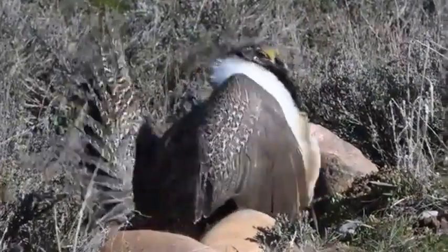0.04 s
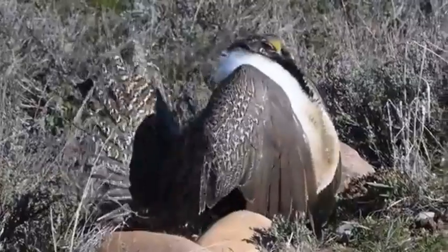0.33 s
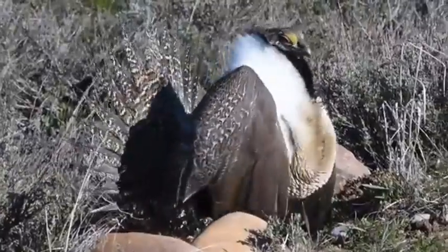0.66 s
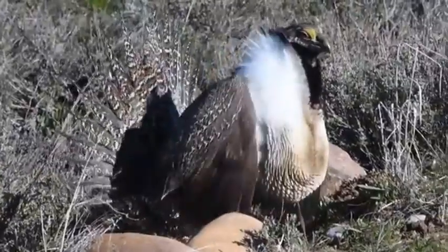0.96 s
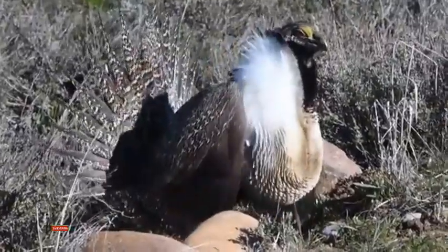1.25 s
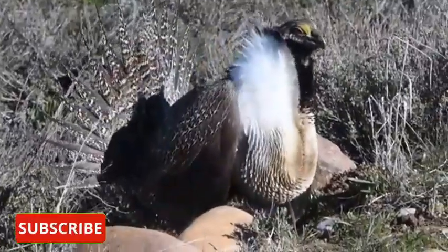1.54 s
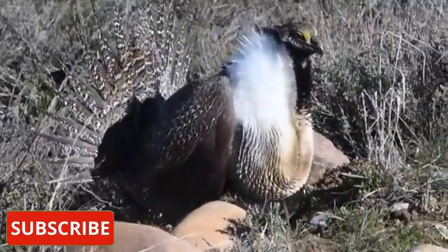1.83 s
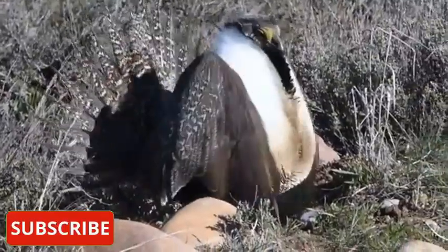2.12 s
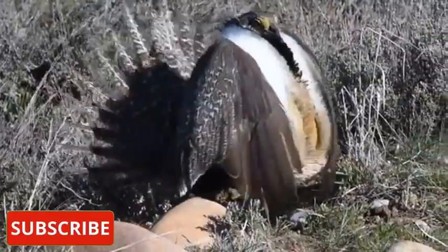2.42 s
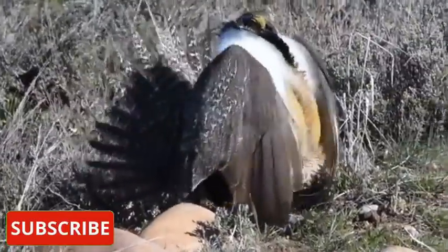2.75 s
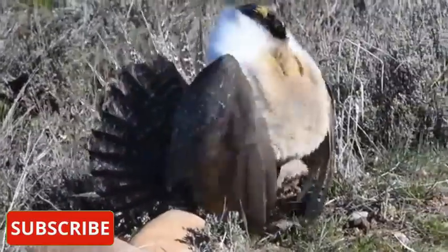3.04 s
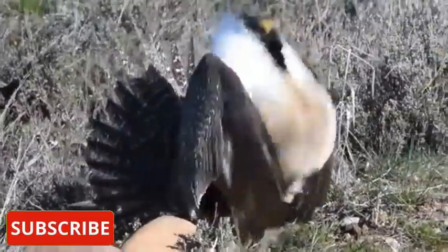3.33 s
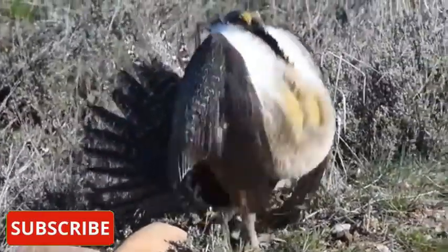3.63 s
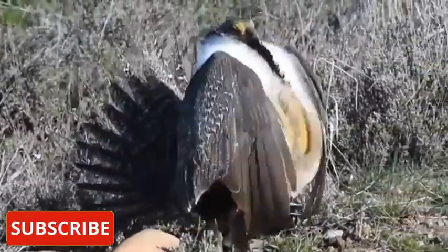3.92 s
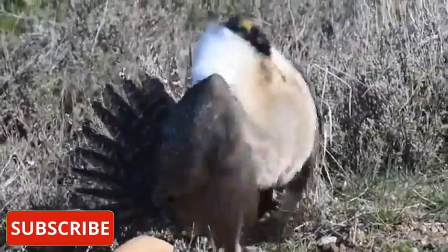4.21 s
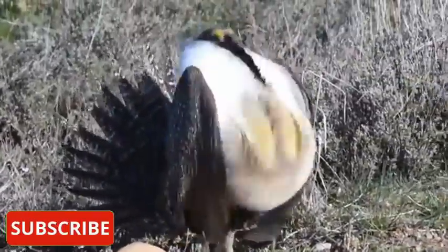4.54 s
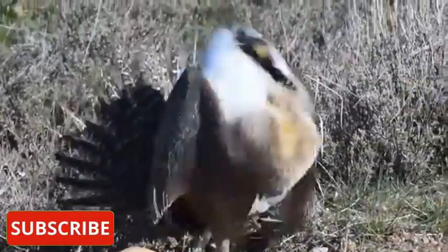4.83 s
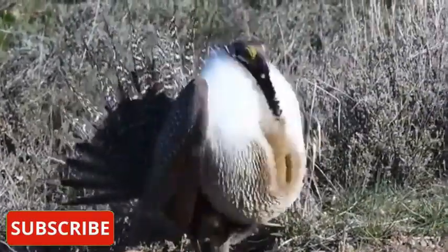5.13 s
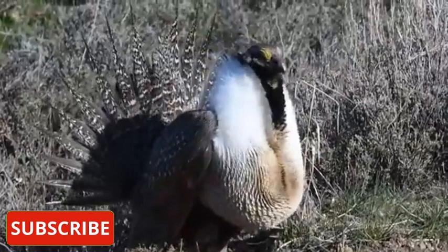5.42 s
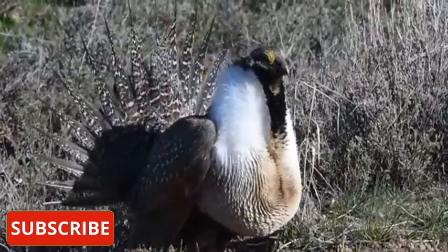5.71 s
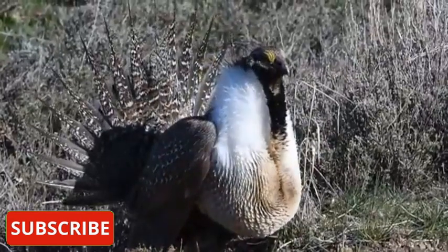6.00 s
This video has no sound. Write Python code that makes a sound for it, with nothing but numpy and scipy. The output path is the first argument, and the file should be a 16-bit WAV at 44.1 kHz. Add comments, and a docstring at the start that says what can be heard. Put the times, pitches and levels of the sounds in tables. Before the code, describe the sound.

On a quiet open plain, a male grouse close to the microphone swishes its wings over stiff breast feathers while a sparrow farther off buzzes, trills and warbles. Soft low thuds from its air sacs follow, with feather rasps and dull puffs. Three hollow coos lead into a sharp pop, a looping whistle and a louder second pop. Faint air and distant chirps continue underneath.

```python
"""A male sage-grouse displays close by on a quiet, open plain, over faint air and the murmur of far grouse.
First his wings swish over stiff breast feathers. Far birds call, and a sparrow buzzes, trills and warbles.
Then his air sacs fill with soft thuds, while his wings rasp over ridged feathers and his breast puffs air.
Last come three coos, a pop of taut sac skin, a looping whistle and a second pop; far birds call on."""
import sys
import numpy as np
from scipy import signal
from scipy.fft import rfft, irfft
from scipy.io import wavfile
from scipy.ndimage import uniform_filter1d

SR = 44100
rng = np.random.default_rng(int(sys.argv[2]) if len(sys.argv) > 2 else 0)


def to_wav(sig):
    """Store sig (one row per channel, or 1-D mono) as 16-bit WAV at the path in sys.argv[1].

    Samples outside -1..1 are clipped; the rate is SR.
    """
    pcm = np.clip(np.atleast_2d(sig), -1, 1) * 32767
    pcm = np.round(pcm).astype(np.int16)
    wavfile.write(sys.argv[1], SR, pcm.T)  # frames by channels


N = 267466
TIME = np.arange(N) / SR
BINS_HZ = np.fft.rfftfreq(N, 1 / SR)


def gain_of(db):
    """Turns decibels into a number to multiply by."""
    return 10 ** (np.asarray(db) / 20)


def evened(x):
    """Scales x to an average (rms) size of 1."""
    return x / np.sqrt(np.mean(abs(x) ** 2) + 1e-20)


def read(points, hz):
    """Looks up a table at the frequencies hz, with octaves evenly spaced."""
    known_hz, value = np.transpose(points)
    return np.interp(np.log(hz + 1), np.log(known_hz + 1), value)


def follow(rows, t):
    """Reads every column of a curve at the times t."""
    times, *columns = np.transpose(rows)
    return [np.interp(t, np.sort(times), column) for column in columns]


def add(mix, start_s, sound):
    """Adds a sound to the mix at start_s."""
    part = mix[max(round(start_s * SR), 0):][:len(sound)]
    part += sound[:len(part)]


def coloured(x, spectrum):
    """Gives x a balance of bass and treble, at an average size of 1."""
    return evened(irfft(rfft(x) * gain_of(read(spectrum, BINS_HZ)), N))


def drift(size, per_s):
    """A random wander that takes per_s turns a second."""
    knots = rng.standard_normal(4000)
    return evened(np.interp(np.arange(size) / SR * per_s, np.arange(len(knots)), knots))


def swell(peak_s, rise_s, fall_s, shape):
    """A rounded hump of loudness, 10 dB down at rise_s before its peak and fall_s after."""
    away = np.maximum((peak_s - TIME) / rise_s, (TIME - peak_s) / fall_s)
    return gain_of(-10 * np.minimum(abs(away) ** shape, 20))


def tone(hz, db):
    """A pure tone (a complex sine) that follows a pitch and a level, with softened ends."""
    edge = np.minimum(np.arange(len(hz)), np.arange(len(hz))[::-1]) / 40
    return np.sqrt(2) * gain_of(db) * np.minimum(edge, 1) * np.exp(2j * np.pi * np.cumsum(hz) / SR)


def fuzzy(hz, width_hz):
    """A band of noise that follows the pitch hz."""
    pole = np.exp(-np.pi * abs(width_hz) / SR)
    noise = rng.standard_normal((len(hz), 2)) @ [1, 1j]
    return evened(signal.lfilter([1], [1, -2 * pole, pole * pole], noise)) * tone(hz, 0)


def place(sound, pan_db, lead_rad=0):
    """Makes stereo: the left side is pan_db louder and, for a complex sound, lead_rad ahead."""
    side = np.array([[.5], [-.5]])
    pair = sound * gain_of(side * pan_db) * np.exp(1j * side * lead_rad)
    return pair.real / np.cosh(pan_db * np.log(10) / 40)


def arcs(table, fade_db, shape):
    """One curve a note: the pitch bends through three values, the level falls away from its peak."""
    progress, curves = np.linspace(0, 1, 41), []
    for start_s, length_s, db, first_hz, middle_hz, last_hz, peak in table:
        bow = 2 * progress * (1 - progress) * (2 * middle_hz - first_hz - last_hz)
        hz = first_hz + (last_hz - first_hz) * progress + bow
        away = np.interp(progress, [0, np.clip(peak, 0, 1), 1], [1, 0, 1])
        curves.append(np.c_[start_s + progress * length_s, hz, db - fade_db * away ** shape])
    return curves


def notes(curves, waver, flutter_db, octave_db, smooth_samples=60):
    """Plays curves as almost pure notes that waver a little, with a weak tone one octave up."""
    out = np.zeros(N, complex)
    for rows in curves:
        t = np.arange(rows[0][0], max(rows[-1][0], rows[0][0] + .004), 1 / SR)
        hz, db = uniform_filter1d(np.array(follow(rows, t)), size=smooth_samples, axis=1)
        hz = hz * (1 + waver * drift(len(t), 403))
        db = db + flutter_db * drift(len(t), 218)
        add(out, t[0], tone(hz, db) + tone(2 * hz, db + octave_db))
    return out


def repeated(curves, repeats):
    """Copies the curves to the time, level and pitch of each repeat."""
    return [[(start_s + t, hz * pitch, db + change_db) for t, hz, db in rows]
            for start_s, change_db, pitch in repeats for rows in curves]


# The colour of still air: frequency_hz, relative_db
AIR_COLOUR = [(20, -19), (60, -2.5), (130, 2), (280, 0.5), (500, -2.5), (1000, -5), (2100, -9),
              (3500, -9.5), (5500, -11.5), (7000, -18), (9000, -20.5), (11000, -17.5), (15500, -21.5)]
# How alike left and right are: frequency_hz, likeness (0 to 1)
AIR_LIKENESS = [(60, 0.27), (150, 0.084), (380, 0.17), (950, 0.078), (2380, 0.033), (5980, 0.039),
                (15000, 0.03)]
def air(level_db=-52):
    """A faint outdoor wash and an even hiss, almost unrelated on the two sides."""
    left, other = rfft(rng.standard_normal((2, N)))
    likeness = read(AIR_LIKENESS, BINS_HZ)
    right = likeness * left + np.sqrt(1 - likeness ** 2) * other
    return coloured(irfft(np.array([left, right]), N), AIR_COLOUR) * gain_of(level_db)


# Swells in the far grouse's murmur: peak_s, level_db, pitch_hz, rise_and_fall_s
MURMUR_SWELLS = [(.93, -56.5, 190, 0.054), (1.7, -61.5, 239.7, 0.5), (2.455, -49, 213, .05),
                 (2.6, -53, 186.2, 0.11), (5.2, -59.5, 295.4, 0.2), (5.49, -54, 187.2, 0.058)]
def far_grouse(width_hz=120, steady_db=-69, steady_hz=210):
    """Other grouse, blurred by distance to a low murmur that swells now and then."""
    out = fuzzy(np.full(N, steady_hz), width_hz) * gain_of(steady_db)
    for peak_s, db, hz, slope_s in MURMUR_SWELLS:
        out += fuzzy(np.full(N, hz), width_hz) * gain_of(db) * swell(peak_s, slope_s, slope_s, shape=1.9)
    return place(out, pan_db=-1)


# A wing brushes the breast: peak_s, level_db, rise_s, fall_s, extra_treble_db
WING_STROKES = [(.01, -55, .05, 0.14, -7), (.85, -54, 0.42, 0.15, -4.5), (2.21, -52, 0.16, 0.17, -4),
                (2.46, -61, 0.15, 0.58, -1), (2.97, -47.5, 0.2, 0.21, 8), (3.16, -45, 0.079, .045, 5),
                (3.33, -58, 0.087, 0.13, 10.5), (3.46, -42.5, 0.066, .05, -5),
                (3.645, -41.5, 0.077, 0.12, -3), (3.925, -45, 0.076, .14, -2.5),
                (4.2, -43.5, 0.085, 0.098, 10), (4.31, -47, 0.085, 0.032, 5.5),
                (4.57, -57, 0.19, 0.12, 7.5), (4.705, -48.5, 0.054, 0.067, 5), (5.0, -64, 0.75, .17, 9.5)]
# The colour of rubbed feathers: frequency_hz, relative_db
FEATHER_COLOUR = [(150, -20), (450, -17), (800, -7), (1400, -9.5), (1850, -0.5), (2300, 3), (3000, -7.5),
                  (4300, -4.5), (6200, -9.5), (7500, -16), (9000, -15.5), (12000, -25.5), (15500, -46)]
# Which side the swish leans to: frequency_hz, left_minus_right_db
FEATHER_PAN = [(60, -3), (150, -5), (380, -10), (950, -1), (2380, -8.5), (5980, 2), (15000, 0)]
def wings(resting_db=-67.5, grain_db=1, likeness=0.69, treble_hz=5000):
    """Countless tiny feather barbs slip past the wing; each stroke swells out of a faint rustle."""
    low_power = treble_power = gain_of(resting_db) ** 2
    for peak_s, db, rise_s, fall_s, treble_db in WING_STROKES:
        power = (gain_of(db) * swell(peak_s, rise_s, fall_s, shape=1.8)) ** 2
        low_power = low_power + power
        treble_power = treble_power + power * gain_of(treble_db) ** 2
    slips = coloured(rng.standard_normal((2, N)) * gain_of(grain_db * drift(N, 600)), FEATHER_COLOUR)
    treble = irfft(rfft(slips) * BINS_HZ ** 2 / (BINS_HZ ** 2 + treble_hz ** 2), N)
    centre, spread = (slips - treble) * np.sqrt(low_power) + treble * np.sqrt(treble_power)
    side = np.array([[1], [-1]])
    swish = centre + np.sqrt((1 - likeness) / 2) * side * spread
    return irfft(rfft(swish) * gain_of(side * read(FEATHER_PAN, BINS_HZ) / 2), N)


# Single far calls: start_s, length_s, level_db, first_hz, middle_hz, last_hz, peak_fraction
FAR_NOTES = [(.485, .11, -64, 2950, 2720, 2760, 0.2), (.8, 0.066, -56, 3350, 3230, 3190, 0.7),
             (.86, .15, -55.5, 3070, 2860, 2850, .5), (2.35, 0.26, -60, 2260, 2082, 1993, 0.1),
             (2.796, 0.028, -51.5, 3290, 3030, 2850, .7), (5.116, 0.03, -57, 2600, 2160, 1870, .3),
             (5.206, .019, -47.5, 2130, 2620, 3120, .5), (5.219, 0.016, -39.5, 2150, 2440, 1980, 0.7),
             (5.235, .032, -55.5, 2030, 1930, 1920, 0.55), (5.643, .034, -59, 2840, 2610, 2370, .4),
             (5.962, .028, -53.5, 4250, 4440, 4740, .35), (6.031, 0.025, -52, 4310, 4470, 4700, .3)]
# One chirp: delay_s, length_s, level_db, first_hz, middle_hz, last_hz, peak_fraction
CHIRP_NOTE = [(0.00032, 0.0338, -47, 3380, 4220, 3100, 0.1)]
# A run of those chirps: start_s, change_db, pitch_factor
CHIRP_REPEATS = [(3.108, -2, 1), (3.194, 2.5, 0.99), (3.282, -0.5, 0.98), (3.366, -1.5, 1)]
def far_birds():
    """Birds farther off give short calls and a run of chirps that rise and fall."""
    calls = arcs(FAR_NOTES, fade_db=5.5, shape=0.9)
    chirps = repeated(arcs(CHIRP_NOTE, fade_db=10, shape=1.3), CHIRP_REPEATS)
    out = notes(calls + chirps, waver=0.0096, flutter_db=3.1, octave_db=-19.5)
    return place(out, pan_db=-3.5, lead_rad=-0.54)


# Buzzes: start_s, length_s, level_db, first_hz, last_hz, swing_hz,
# first_flicks_per_s, last_flicks_per_s, fade_db
SPARROW_BUZZES = [(1.088, 0.16, -35, 4470, 4890, 446, 193, 167, 7.5),
                  (1.407, 0.15, -34.5, 4600, 4870, 450, 143.4, 214, 8.5),
                  (2.163, 0.074, -41, 5910, 5810, 696, 308, 273, 1.5),
                  (2.434, 0.059, -42.5, 6130, 5720, 660, 283, 269, 7),
                  (2.71, 0.035, -44.5, 5350, 4000, 400, 300, 290, 0)]
# The voice box's other side holds a note under the first two buzzes: time_s, pitch_hz, level_db
HELD_NOTES = [
    [(1.1, 4300, -45), (1.122, 4130, -39), (1.16, 4070, -42), (1.2, 4100, -49), (1.222, 3800, -56)],
    [(1.42, 4350, -41), (1.44, 4220, -38.5), (1.47, 4095, -41.5), (1.52, 4220, -47), (1.54, 4080, -52)],
]
def sparrow_buzzes(jitter=0.076, throb_db=3, rough_db=2, waver_hz=60):
    """The pitch flicks up unevenly, a few hundred times a second; each buzz starts soft, then catches."""
    out = np.zeros(N, complex)
    for start_s, length_s, db, first_hz, last_hz, swing_hz, first_rate, last_rate, fade_db in SPARROW_BUZZES:
        size = int(length_s * SR)
        progress = np.linspace(0, 1, size)
        rate = np.linspace(first_rate, last_rate, size) * (1 + jitter * drift(size, 117))
        phase = 2 * np.pi * np.cumsum(rate) / SR
        flick = (.5 + .5 * signal.sawtooth(phase, .8)) ** 3
        flick_hz = 2 * swing_hz * np.minimum(0.43 + 2 * progress, 1)  # widens as the note takes hold
        glide_hz = first_hz + (last_hz - first_hz) * progress ** 1.4
        hz = glide_hz + flick_hz * (flick - flick.mean()) + waver_hz * drift(size, 908)
        catch_db = np.interp(progress, [0, 0.12, 0.142], [-16, -13, 0])
        shake_db = throb_db * np.sin(phase - .6) + rough_db * drift(size, 420)
        release = np.minimum((1 - progress) / 0.17, 1) ** 1.2
        buzz = tone(hz, db + catch_db - fade_db * progress + shake_db) * release
        band_hz = [min(first_hz, last_hz) - 0.74 * swing_hz, max(first_hz, last_hz) + 0.74 * swing_hz]
        throat = signal.butter(3, band_hz, "band", fs=SR, output="sos")
        add(out, start_s, signal.sosfilt(throat, buzz))
    out += notes(HELD_NOTES, waver=0.01, flutter_db=-0.5, octave_db=-29)
    return place(out, pan_db=-2.5, lead_rad=-0.55)


# Sliding notes: start_s, length_s, level_db, first_hz, middle_hz, last_hz, peak_fraction
SLIDES = [(1.257, 0.091, -44.5, 2880, 3060, 2600, 0.28), (1.34, .02, -41.5, 2650, 2444, 2120, 0.5),
          (1.356, 0.024, -52.5, 2100, 1900, 1830, 0), (1.56, 0.087, -42.5, 2880, 3090, 3030, 0.5),
          (2.695, 0.029, -44.5, 5860, 5400, 4600, 0.4), (2.724, 0.048, -43, 4840, 3510, 2750, 0.26),
          (2.897, .044, -44, 5600, 5230, 4100, 0.5), (2.938, .04, -45, 4150, 3250, 2680, 0.1)]
def sparrow_slides():
    """The sparrow's plain whistles, most of them sliding down."""
    out = notes(arcs(SLIDES, fade_db=9, shape=1.05), waver=0.011, flutter_db=1.5, octave_db=-20.5)
    return place(out, pan_db=-5, lead_rad=-0.26)


# Five quick notes: delay_s, length_s, level_db, first_hz, middle_hz, last_hz, peak_fraction
TRILL_NOTES = [(0, 0.0067, -37, 3350, 3880, 3370, 1), (.006, 0.017, -34, 3680, 3800, 3060, 0.44),
               (.021, 0.0077, -35.5, 4670, 3850, 3170, .4), (.029, .017, -37, 4400, 3880, 3650, .25),
               (.059, .026, -36, 7250, 6220, 4930, 0.72)]
# Each time they are sung: start_s, change_db, pitch_factor
TRILL_REPEATS = [(1.699, -1, 1.004), (1.817, -1, 0.98), (1.931, -2.5, 1.002), (2.046, -1.5, 1.02)]
def sparrow_trill():
    """A flick, three quick slides and a high falling note, sung four times over."""
    curves = repeated(arcs(TRILL_NOTES, fade_db=17, shape=1.7), TRILL_REPEATS)
    return place(notes(curves, waver=0.025, flutter_db=0.6, octave_db=-35), pan_db=1.3)


# Wobbling notes: start_s, length_s, level_db, first_hz, top_hz, dip_hz, dips_per_s
SPARROW_WARBLES = [(2.244, .148, -44.5, 3520, 4005, 663, 69), (2.501, 0.14, -44, 3510, 3985, 650, 59)]
def sparrow_warbles(throb_db=12, climb_s=.045, jitter=0.14, waver_hz=70, rough_db=2):
    """The pitch dips again and again, and the note is loudest in each dip; no two are quite alike."""
    out = np.zeros(N, complex)
    for start_s, length_s, db, first_hz, top_hz, dip_hz, rate in SPARROW_WARBLES:
        size = int(length_s * SR)
        turns = np.cumsum(rate * (1 + jitter * drift(size, 122))) / SR
        grown = np.minimum(TIME[:size] / climb_s, 1)  # the note starts smooth and low
        flick = grown * (1 - abs(np.sin(np.pi * turns)))
        hz = first_hz + (top_hz - first_hz) * grown - dip_hz * (1 - flick) + waver_hz * drift(size, 703)
        level_db = db - throb_db * flick + rough_db * drift(size, 397)
        add(out, start_s, tone(hz, level_db) * signal.windows.tukey(size, .25))
    return place(out, pan_db=1.3)


# One tick: delay_s, length_s, level_db, first_hz, middle_hz, last_hz, peak_fraction
TICK_NOTE = [(0.0016, 0.0063, -47.5, 9300, 5300, 5100, 0.66)]
# A run of ticks: start_s, change_db, pitch_factor
TICK_REPEATS = [(2.428, 2, 1), (2.49, -3, 0.94), (2.541, 2.5, 0.8), (2.593, 1.5, 0.99), (2.641, 1, 0.98)]
def ticking_bird():
    """Another small bird's notes drop so fast that they sound like thin ticks."""
    curves = repeated(arcs(TICK_NOTE, fade_db=13, shape=1.2), TICK_REPEATS)
    return place(notes(curves, waver=0.025, flutter_db=0.6, octave_db=-35), pan_db=1.3)


# Three thuds, then the two pops: start_s, level_db, first_hz, settled_hz, glide_s, rise_s, ring_s
SAC_BLOWS = [(2.944, -46, 149, 130, 0.013, 0.007, 0.084), (3.184, -38, 104, 123, 0.022, 0.0091, 0.2),
             (4.335, -32.5, 105, 124.3, 0.018, .014, 0.18),
             (4.8051, -13.5, 270, 128.5, 0.0045, 0.00068, 0.028),
             (4.9992, -1, 279, 350, 0.01, 0.0064, 0.046)]
def sac_booms(choke=1.07, lowest_hz=85):
    """Each blow sets the air sacs swinging; the pitch settles, and they fade faster as the skin slackens."""
    out, t = np.zeros(N, complex), TIME[:SR // 4]
    for start_s, db, first_hz, settled_hz, glide_s, rise_s, ring_s in SAC_BLOWS:
        hz = settled_hz + (first_hz - settled_hz) * np.exp(-t / glide_s)
        swing = -1j * tone(hz, db - 60 * (t / ring_s) ** choke)  # -1j starts the wave at zero
        add(out, start_s, swing * (1 - np.exp(-t / rise_s)))
    small_body = signal.butter(2, lowest_hz, "high", fs=SR, output="sos")  # gives no deep bass
    return place(signal.sosfilt(small_body, out), pan_db=0.2, lead_rad=0.12)


# The wing's edge crosses ridged feathers, one curve a sweep: time_s, ridges_per_s, level_db
RASP_SWEEPS = [
    [(2.96, 2350, -48), (3.01, 2120, -41.5), (3.05, 1970, -41), (3.08, 1630, -45.5), (3.11, 1860, -40),
     (3.135, 2030, -37), (3.155, 2900, -41.5), (3.172, 5300, -39.5), (3.19, 6600, -41)],
    [(4.225, 5700, -58), (4.25, 4200, -39), (4.268, 3700, -42), (4.279, 2100, -41), (4.295, 3850, -40),
     (4.312, 5050, -41.5), (4.333, 6700, -43)],
    [(4.675, 2160, -65), (4.703, 2240, -42), (4.725, 5200, -51), (4.74, 4000, -65)],
]
def feather_rasps(spread=.3, scrape_db=-7, scrape_width_hz=1500):
    """Ridges pass the wing's edge unevenly: a rough note, wider the faster it runs, and a broad scrape."""
    out = np.zeros(N, complex)
    for rows in RASP_SWEEPS:
        t = np.arange(rows[0][0], rows[-1][0], 1 / SR)
        hz, db = follow(rows, t)
        grip = rng.standard_normal((2000, 2)) @ [1, 1j]
        note = tone(hz, 0) * evened(np.interp(spread * np.cumsum(hz) / SR, np.arange(len(grip)), grip))
        scrape = gain_of(scrape_db) * fuzzy(hz, scrape_width_hz)
        contact = signal.windows.tukey(len(t), .08)  # the wing meets and leaves the ridges gently
        add(out, t[0], gain_of(db) * contact * (note + scrape) / np.hypot(1, gain_of(scrape_db)))
    return place(out, pan_db=-6.5)


# Dull puffs: start_s, level_db, pitch_hz, width_hz, length_s
AIR_PUFFS = [(3.161, -48, 650, 450, 0.053), (4.304, -46.5, 613, 450, 0.048), (4.997, -29.5, 727, 400, .011)]
def puffs():
    """Air is pushed aside as the breast drops or the sacs collapse."""
    out = np.zeros(N, complex)
    for start_s, db, hz, width_hz, length_s in AIR_PUFFS:
        hump = np.hanning(int(length_s * SR))
        add(out, start_s, fuzzy(np.full(len(hump), hz), width_hz) * hump * gain_of(db))
    return place(out, pan_db=-4)


# One curve a coo: time_s, pitch_hz, level_db
COO_CURVES = [
    [(4.508, 359.6, -57), (4.524, 324.6, -42), (4.536, 317, -33.5), (4.55, 340, -39.5), (4.568, 380, -64)],
    [(4.59, 360.3, -66), (4.618, 420.3, -44.5), (4.635, 475, -27), (4.648, 505, -24), (4.661, 506, -23),
     (4.676, 518, -29.5), (4.69, 500, -39), (4.712, 450, -60)],
    [(4.712, 464, -61), (4.738, 490, -46), (4.751, 496, -35), (4.763, 375, -28.5), (4.776, 329, -39),
     (4.803, 421, -35.5)],
]
# Two hums and a low echo: start_s, length_s, level_db, first_hz, middle_hz, last_hz, peak_fraction
LOW_TONES = [(4.513, 0.067, -48.5, 150, 159, 200, 0.35), (4.868, .065, -49, 230, 280, 320, 0.6),
             (5.026, .05, -45, 250, 210, 205, 0.3)]
def coos():
    """Three hollow coos, low hums under the first coo and the whistle, a low echo after the last pop."""
    curves = COO_CURVES + arcs(LOW_TONES, fade_db=9, shape=1.6)
    out = notes(curves, waver=0.0031, flutter_db=1.9, octave_db=-35, smooth_samples=300)
    return place(out, pan_db=0.5, lead_rad=-0.73)


# The sac skin snaps: start_s, peak_db, tilt_db_per_octave
SKIN_SNAPS = [(4.8019, -12, -4), (4.8045, -3.5, 1), (4.8072, -22, 10), (4.8102, -19.5, -2.5),
              (4.9996, -18.5, 7.5), (5.0012, -25, -7)]
# The colour of a snap: frequency_hz, relative_db
SKIN_COLOUR = [(100, -15), (400, -2.5), (900, 5), (1600, 4), (2250, 6.5), (3100, -15.5), (4300, -8.5),
               (6000, -20.5), (8000, -23), (12000, -36), (16000, -68)]
def sac_snaps():
    """The pops begin with clicks of taut skin, over in about a millisecond."""
    out, hz = np.zeros(N), abs(np.fft.fftfreq(2048, 1 / SR))
    for start_s, db, tilt_db in SKIN_SNAPS:
        log_gain = np.log(gain_of(read(SKIN_COLOUR, hz) + tilt_db * np.log2(hz / 2000 + 0.13)))
        click = np.fft.ifft(np.exp(signal.hilbert(log_gain).conj())).real  # no sound before the snap
        add(out, start_s, -gain_of(db) * click / abs(click).max())
    return place(out, pan_db=-5.5)


# The whistle's path: time_s, pitch_hz, level_db
WHISTLE_CURVE = [(4.808, 870, -29.5), (4.835, 1227, -43), (4.851, 1560, -30.5), (4.87, 2542, -25.5),
                 (4.8815, 2383, -16.5), (4.892, 1147, -35.5), (4.912, 563, -45), (4.934, 890, -50.5),
                 (4.957, 1810, -47.5), (4.988, 1400, -60)]
# Faint tones under its top and with the second pop:
# start_s, length_s, level_db, first_hz, middle_hz, last_hz, peak_fraction
FAINT_TONES = [(4.856, .034, -46, 1640, 1720, 1140, .35), (4.999, 0.027, -40, 2100, 1914, 2260, 0)]
def whistle(echo_s=0.015, echo_db=-30):
    """A whistle loops up, down and up again between the pops, and echoes off the bushes."""
    curves = [WHISTLE_CURVE] + arcs(FAINT_TONES, fade_db=11, shape=1.1)
    out = notes(curves, waver=0.0044, flutter_db=3.24, octave_db=-39, smooth_samples=200)
    add(out, echo_s, gain_of(echo_db) * out)
    return place(out, pan_db=-7.5)


# How long the plain's echo takes to fade by 60 dB: frequency_hz, fade_s
ECHO_FADES = [(150, 0.49), (400, 0.28), (1500, 0.08), (6000, 0.034)]
def plain_echoes(sound, echoes_per_s=2000):
    """Bushes and slopes send back a thin tail of echoes that lasts longest in the bass."""
    taps = rng.standard_normal((2, SR)) * (rng.random((2, SR)) < echoes_per_s / SR) * (TIME[:SR] > .004)
    hz, t, spectra = signal.stft(taps + .5 * taps[::-1], SR, nperseg=256)
    fade = gain_of(-60 * t / read(ECHO_FADES, hz)[:, None])
    tail = signal.istft(spectra * fade, SR, nperseg=256)[1]
    return signal.fftconvolve(sound.mean(0)[None], tail / np.linalg.norm(tail[0]), axes=1)[:, :N]


def scene():
    """The grouse is near, with little echo; the small birds are farther off, with more."""
    background = air() + far_grouse()
    body = wings() + sac_booms() + feather_rasps() + puffs()
    sparrow = sparrow_buzzes() + sparrow_slides() + sparrow_trill() + sparrow_warbles()
    birds = far_birds() + sparrow + ticking_bird()
    calls = coos() + sac_snaps() + whistle()
    echoes = plain_echoes(gain_of(-33.5) * body + gain_of(-10.5) * birds + gain_of(-26.5) * calls)
    return background + body + birds + calls + echoes


# Narrow gaps in the treble: centre_hz, width_hz
TREBLE_GAPS = [(7720, 610), (9680, 700)]
def record(dry, top_hz=15800):
    """Cuts two gaps in the treble, then removes everything above top_hz."""
    gaps = [abs(BINS_HZ - hz) / np.hypot(BINS_HZ - hz, width_hz / 2) for hz, width_hz in TREBLE_GAPS]
    notched = irfft(rfft(dry) * np.prod(gaps, axis=0) ** 2, N)
    low_pass = signal.firwin(511, top_hz, window=("kaiser", 9), fs=SR)
    return signal.oaconvolve(notched, low_pass[None], "same")


dry = scene()
out = record(dry)
to_wav(out)
```